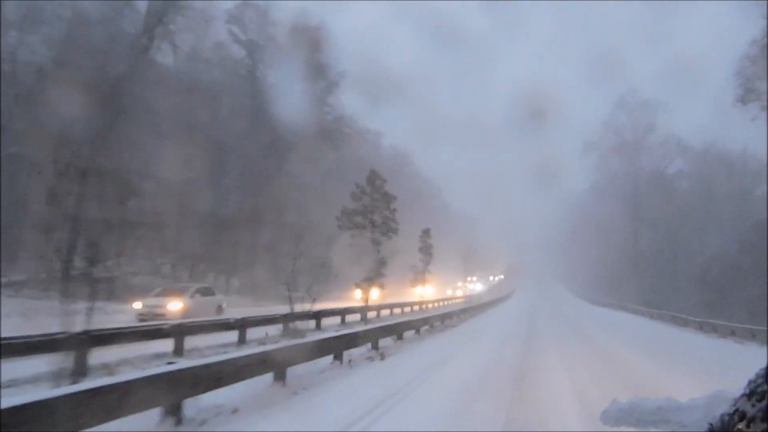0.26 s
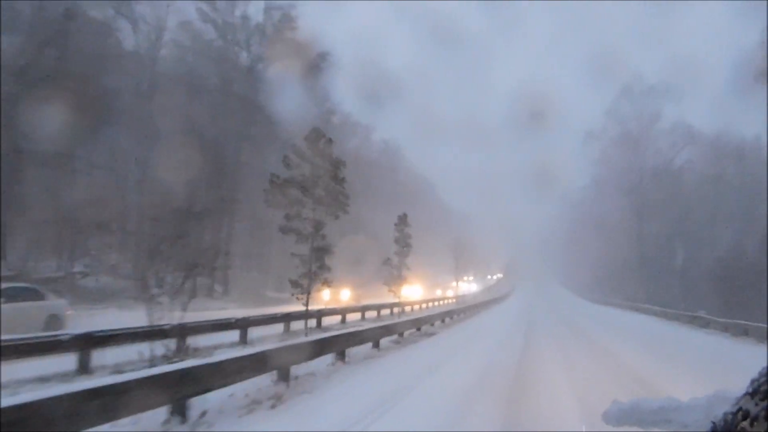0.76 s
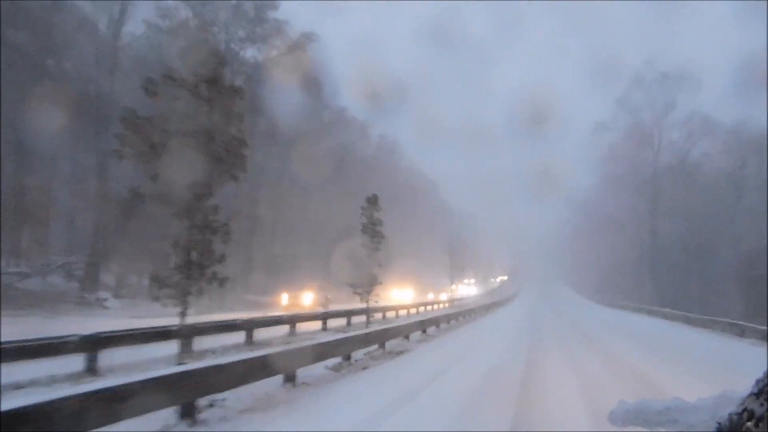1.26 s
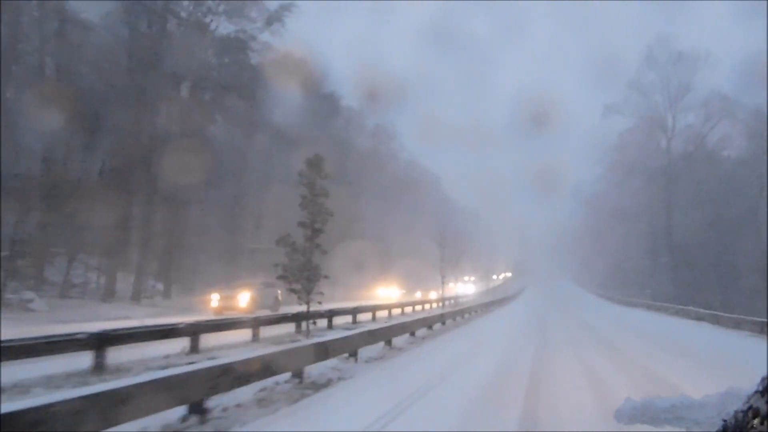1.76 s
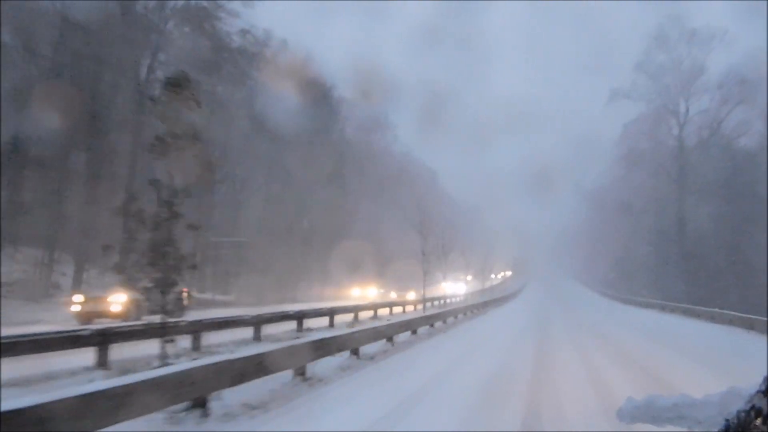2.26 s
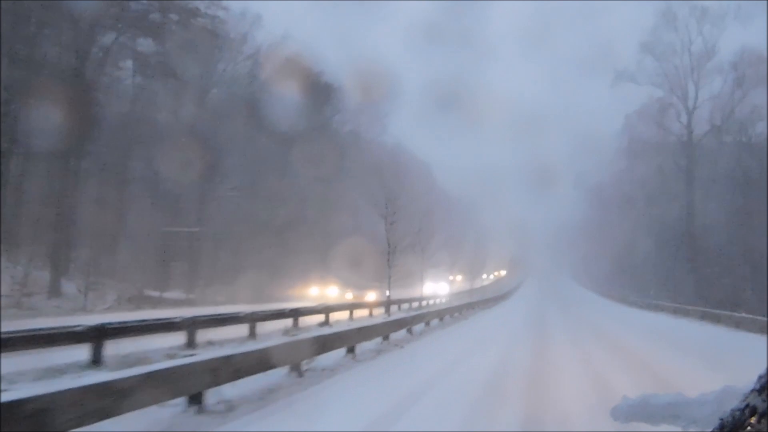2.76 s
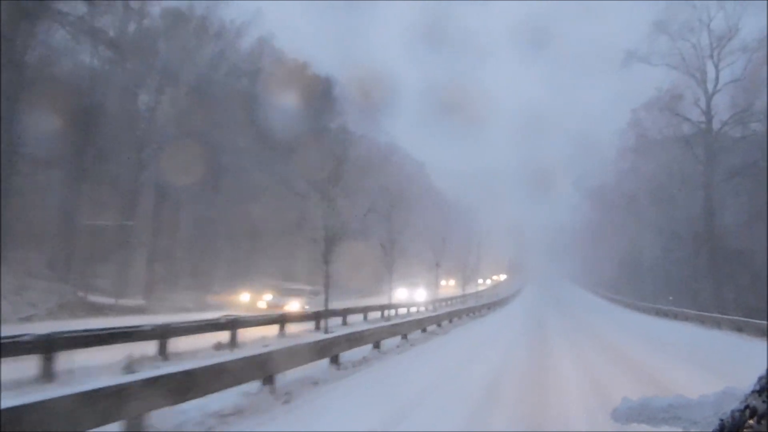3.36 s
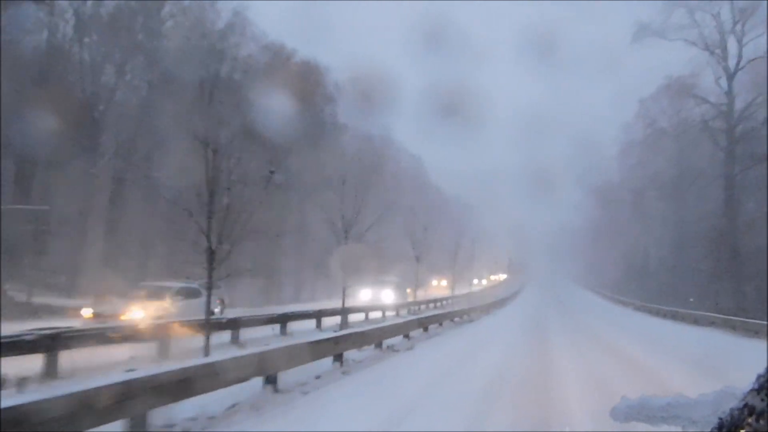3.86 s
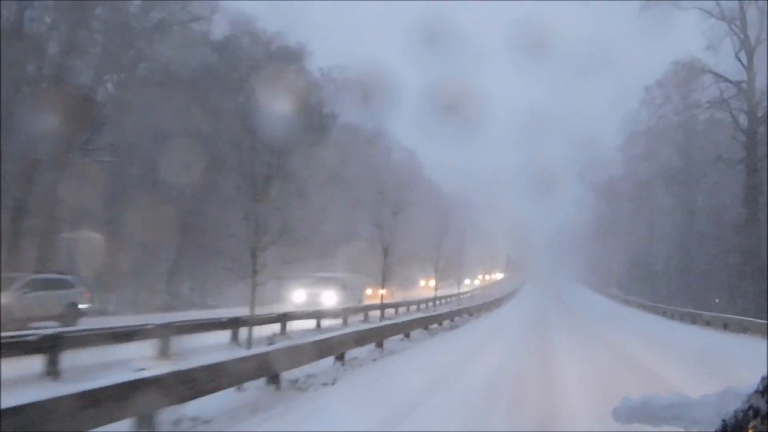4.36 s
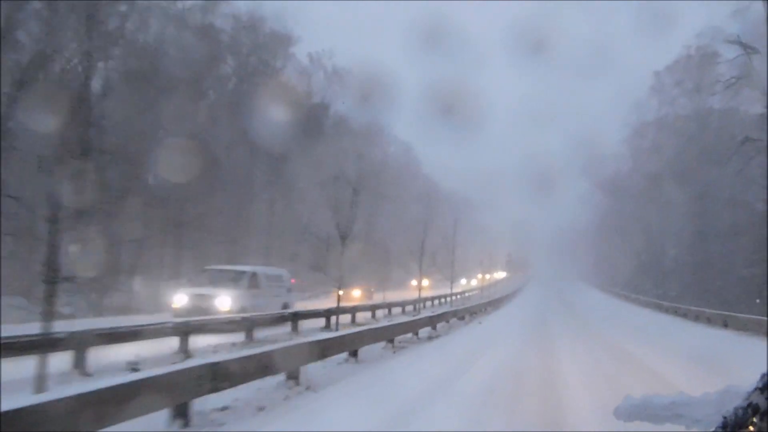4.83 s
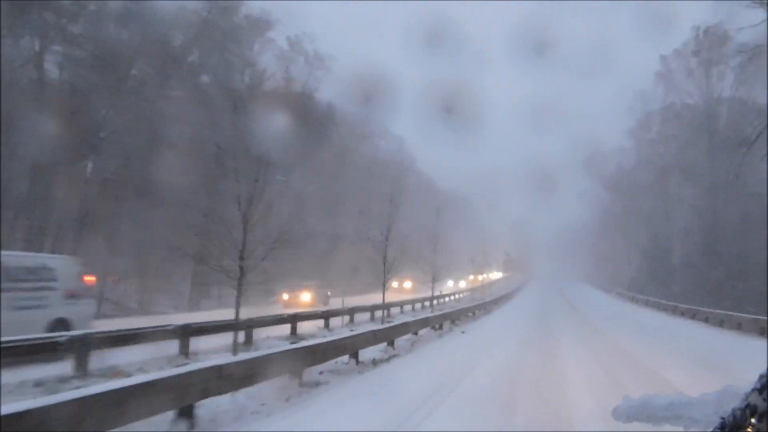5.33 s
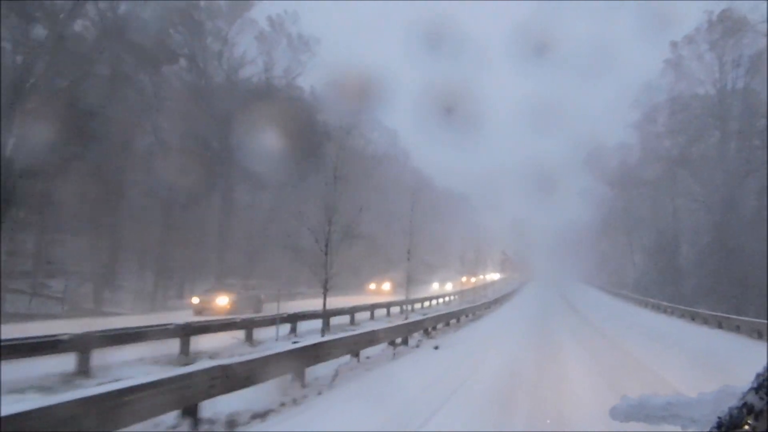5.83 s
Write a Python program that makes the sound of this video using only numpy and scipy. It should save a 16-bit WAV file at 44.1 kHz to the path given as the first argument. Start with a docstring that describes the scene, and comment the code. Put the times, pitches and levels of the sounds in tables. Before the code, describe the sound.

Rough snowstorm wind buffets a microphone on a car moving along a snowy highway, and it is the only sound for the whole six seconds or so. It is a dense, close, midrange rush with some low rumble beneath and a bright, spitting hiss above, all fluttering rapidly. The loudness stays even and compressed, so gusts mostly change the tone. The left side is choppy and gusty, the right steadier and slightly brighter. The flow catches for split seconds, dulling the hiss, several times between 0.5 and 2.3 seconds, again just after 3 seconds, and between about 4.6 and 5.2 seconds. The wind slackens slightly around 0.9, 2.3, 4.5 and 5.2 seconds, and brightens with small gusts near 2.5 and 4 seconds. The rush carries on to the end without fading.

```python
"""A rough, hissing rush of snowstorm air, buffeting two microphone ports on a car on a snowy highway.
Each port sits in its own turbulence: faster flow means quicker eddies and much more hiss.
Gusts sway the left port and hardly reach the right one. The flow stalls briefly, mostly when
a gust slackens. A fast limiter holds the loudness even."""
import sys
import numpy as np
from scipy.fft import rfft, irfft, next_fast_len
from scipy.io import wavfile
from scipy.ndimage import uniform_filter1d, minimum_filter1d, map_coordinates

SR = 44100
rng = np.random.default_rng(int(sys.argv[2]) if len(sys.argv) > 2 else 0)


def store_pcm(level_fs):
    """Save levels as 16-bit WAV."""
    pcm = np.round(np.clip(level_fs, -1, 1) * 32767).astype(np.int16)
    wavfile.write(sys.argv[1], SR, np.atleast_2d(pcm).T)


N = 268745
EDDY_HZ = 1500  # eddies fade above this at reference speed; flow speeds are in octaves from there


def wind(speed_oct, level_db, hiss_db, push_db_per_oct, shear_db_per_oct=14):
    """Pressure at one port: eddies and hiss both grow with speed, the hiss far more steeply."""
    pressure = eddies(speed_oct) + amp(hiss_db + shear_db_per_oct * speed_oct) * hiss()
    return amp(level_db + push_db_per_oct * speed_oct) * pressure


# Eddy pressure spectrum at reference speed. Each row: frequency in Hz, relative density in dB.
EDDY_SPECTRUM = [(25, 1.5), (140, -5), (400, -2), (800, 0.5), (1150, 0), (1500, -3), (2200, -10),
                 (3200, -20.5), (6000, -31), (12000, -84)]

def eddies(speed_oct):
    """A frozen pattern of eddies sweeps past the port, so its whole spectrum slides with speed."""
    pattern = noise(EDDY_SPECTRUM, size=2 * N)
    travel_samples = np.cumsum(2 ** speed_oct)
    return map_coordinates(pattern, [travel_samples], order=3, mode="wrap")


# Rim hiss spectrum. Each row: frequency in Hz, relative density in dB.
HISS_SPECTRUM = [(500, -12), (1500, 2), (2800, 0), (4500, -4), (7000, -7), (11000, -11.5), (16000, -16)]

def hiss(spit_db=1.0):
    """Air shears over the rim of a port in tiny spits."""
    return unit(noise(HISS_SPECTRUM, size=N) * amp(spit_db * wobble(rate_hz=1200)))


def left_flow():
    """Choppy air: follows every gust, stalls often, is shot through with jets."""
    stream_oct = gusts(mean_hz=1419.7, sway=1.25)
    stall_oct = stalls(stream_oct, side=0, length_s=.026, depth_oct=.55, count=28)
    return flow(stream_oct, stall_oct, jets(count=185), churn_oct=.27, free_hz=2253.6, stall_hz=760.2)


def right_flow():
    """Faster, steadier air: its chance stalls are few, short and shallow."""
    stream_oct = gusts(mean_hz=1774.8, sway=.28)
    stall_oct = stalls(stream_oct, side=1, length_s=.015, depth_oct=.38, count=12)
    return flow(stream_oct, stall_oct, jets(count=40), churn_oct=.17, free_hz=2197.7, stall_hz=701.6)


def flow(stream_oct, stall_oct, jet_pull, churn_oct, free_hz, stall_hz, flutter_oct=.16, knee_oct=.1):
    """Speed at one port in octaves: large whirls flip it between fast and slow, small ones flutter."""
    whirls_oct = churn_oct * np.tanh(2 * wobble(rate_hz=95)) + flutter_oct * wobble(rate_hz=330)
    speed_oct = stream_oct - stall_oct + whirls_oct * np.exp(-.8 * stall_oct)  # stalled air is calmer
    slowest_oct, fastest_oct = np.log2(np.array([stall_hz, free_hz]) / EDDY_HZ)
    speed_oct += jet_pull * (fastest_oct - speed_oct)
    # soft limits: never quite stops, never outruns the free stream
    speed_oct = slowest_oct + knee_oct * np.logaddexp(0, (speed_oct - slowest_oct) / knee_oct)
    return fastest_oct - knee_oct * np.logaddexp(0, (fastest_oct - speed_oct) / knee_oct)


# Gust speed contour. Each row: time in seconds, eddy roll-off in Hz before centring and scaling.
GUST_CONTOUR = [(0.0, 1300.0), (0.45, 1460.0), (0.88, 1260.0), (1.02, 1280.0), (1.3, 1450.0), (1.92, 1459),
                (2.28, 1190.0), (2.53, 1640.0), (2.75, 1430.0), (3.07, 1350.0), (3.72, 1390.0),
                (3.97, 1609), (4.25, 1491), (4.5, 1250.0), (4.72, 1441), (5.17, 1200.0), (5.42, 1490.0),
                (6.09, 1409)]

def gusts(mean_hz, sway):
    """Slow flow at a port in octaves: its own mean speed, swayed by the gusts."""
    times_s, rolloff_hz = np.transpose(GUST_CONTOUR)
    gust_oct = np.log2(np.interp(np.arange(N) / SR, times_s, rolloff_hz))
    return np.log2(mean_hz / EDDY_HZ) + sway * (gust_oct - gust_oct.mean())


# Main stalls. Each row: centre in seconds, length in seconds, left and right depth in octaves.
MAIN_STALLS = [(0.063, .03, 0.71, 0.09), (0.548, .03, 0.54, 0.44), (0.653, .016, .3, .42),
               (0.760, 0.027, 0.49, 0.71), (0.822, .022, 0.57, .4), (0.870, .17, .18, .4),
               (1.090, 0.061, .1, 0.4), (1.326, .016, 0.0077, 0.61), (1.399, 0.018, 0.39, 0.87),
               (1.706, .023, 0.31, 0.91), (1.975, .026, 0.83, 0), (2.149, .015, 0, 0.51),
               (2.207, .02, 0.47, 0.78), (2.307, 0.031, 0.007, .95), (3.034, .018, 0.57, 0.63),
               (3.065, .045, .6, .1), (3.158, .02, 0.44, .73), (4.650, .02, 0.59, 0.68),
               (4.765, .018, 0.44, .42), (4.975, .026, 0.31, 1.03), (5.075, .019, .3, 0.81),
               (5.134, 0.031, 0.56, 1.043), (5.680, .018, .1, 0.52)]

def stalls(stream_oct, side, length_s, depth_oct, count, slack_bias_per_oct=4.0):
    """Octaves lost as the flow breaks away from a port: main stalls, and chance ones in slack air."""
    main_oct = bumps(np.array(MAIN_STALLS)[:, [0, 1, 2 + side]])
    chance = np.exp(-slack_bias_per_oct * stream_oct)
    return np.maximum(main_oct, bursts(chance, length_s, depth_oct, count))


def jets(count):
    """Small jets of fast air, as a pull of 0 to 1 towards the free stream."""
    return np.clip(bursts(np.ones(N), length_s=.003, height=.47, count=count), 0, 1)


def bursts(chance, length_s, height, count):
    """Bumps of scattered length and height, falling mostly where the chance is high."""
    when, long, strong = rng.random((count, 3)).T
    centres_s = np.interp(when, np.cumsum(chance) / np.sum(chance), np.arange(N) / SR)
    return bumps(zip(centres_s, length_s * (.5 + long), height * (.5 + strong)))


def bumps(rows):
    """Sum of flat-topped bumps."""
    t, total = np.arange(N) / SR, np.zeros(N)
    for centre_s, length_s, height in rows:
        near = slice(*np.searchsorted(t, [centre_s - length_s, centre_s + length_s]))
        total[near] += height * .5 ** ((2 * (t[near] - centre_s) / length_s) ** 6)
    return total


def wobble(rate_hz):
    """Smooth random curve of rms 1, with knots at rate_hz."""
    knots = rng.standard_normal(N // 16)
    return unit(map_coordinates(knots, [np.arange(N) * rate_hz / SR], mode="wrap"))


def noise(spectrum, size):
    """Noise of rms 1, coloured by (Hz, dB) points on a log axis."""
    points_hz, db = np.transpose(spectrum)
    colour = lambda hz: amp(np.interp(np.log(hz + 1), np.log(points_hz), db))
    return unit(filtered(rng.standard_normal(size), colour))


def filtered(x, response):
    """Apply a frequency response."""
    length = x.shape[-1]
    padded = next_fast_len(length + 8192)
    hz = np.fft.rfftfreq(padded, 1 / SR)
    return irfft(rfft(x, padded) * response(hz), padded)[..., :length]


def amp(db):
    """Decibels to gain."""
    return 10 ** (np.asarray(db) / 20)


def unit(x):
    """Scale to rms 1."""
    return x / np.sqrt(np.mean(x ** 2) + 1e-20)


def scene():
    """Wind pressure at the left and right ports."""
    return np.array([wind(left_flow(), level_db=-33.5, hiss_db=-16.5, push_db_per_oct=5.0),
                     wind(right_flow(), level_db=-31.0, hiss_db=-15.5, push_db_per_oct=8.0)])


def limiter(x, ceiling_db, hold_s):
    """Each channel's gain ducks at once under its own peaks."""
    window = max(3, int(hold_s * SR))
    needed_gain = np.minimum(1, amp(ceiling_db) / (np.abs(x) + 1e-9))
    held_gain = minimum_filter1d(needed_gain, window, axis=-1)
    return x * uniform_filter1d(held_gain, window, axis=-1)


# Microphone colour. Each row: frequency in Hz, left gain in dB, right gain in dB.
MIC_RESPONSE = [(100, -1, -2.5), (307, 0.97, -1), (1170, -1.5, -1), (5000, 0, 0.08), (15000, -0.5, 1)]

def record(dry, low_cut_hz=90, top_hz=15830):
    """The wind drives the limiter throughout; then microphone colour, low cut and band limit."""
    limited = limiter(dry, ceiling_db=-29.0, hold_s=0.00075)
    points_hz, *sides_db = np.transpose(MIC_RESPONSE)
    colour = lambda hz: amp([np.interp(np.log(hz + 1), np.log(points_hz), db) for db in sides_db])
    low_cut = lambda hz: 1j * hz / (1j * hz + low_cut_hz)
    return filtered(limited, lambda hz: colour(hz) * low_cut(hz) * (hz < top_hz))


dry = scene()
out = record(dry)
store_pcm(out)
```